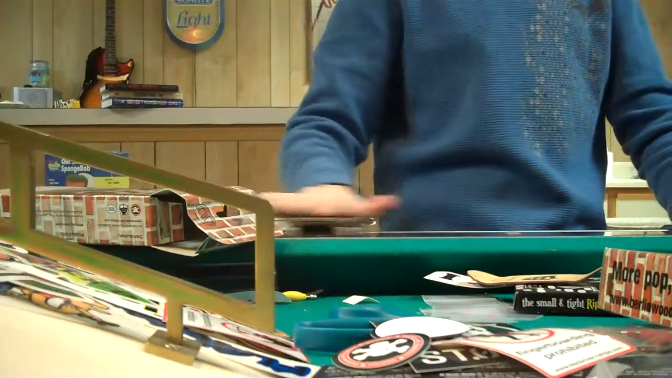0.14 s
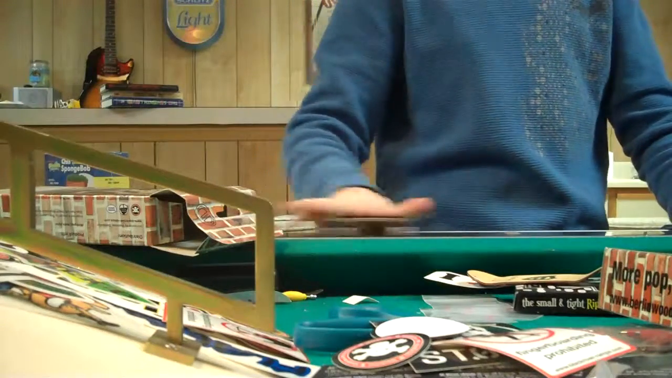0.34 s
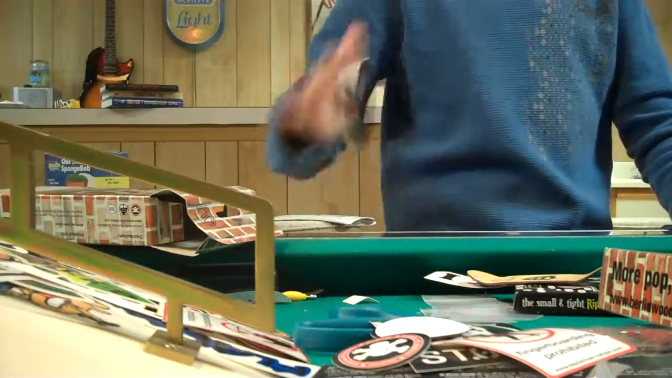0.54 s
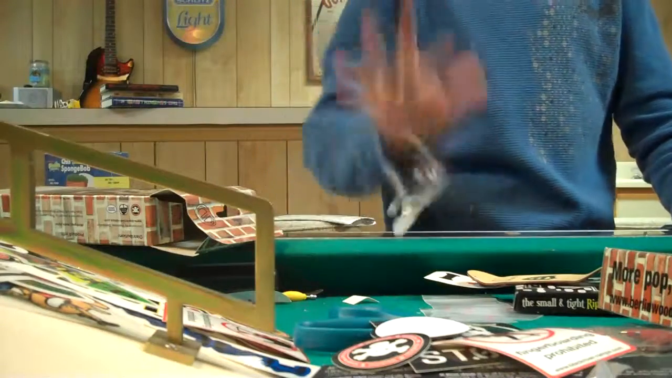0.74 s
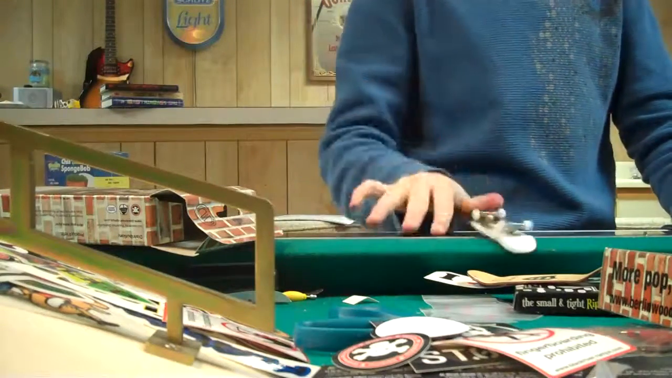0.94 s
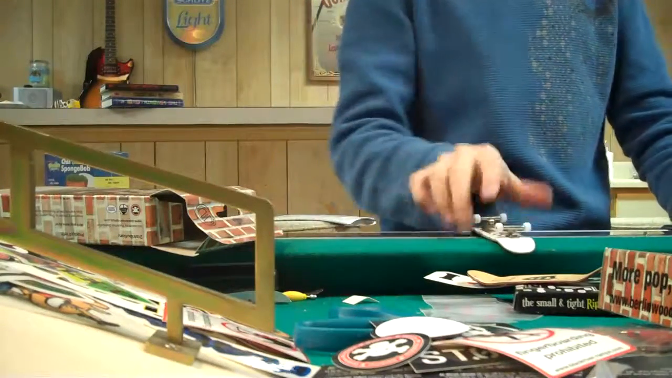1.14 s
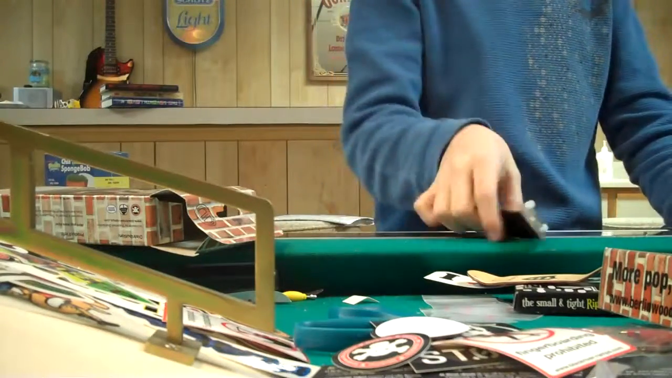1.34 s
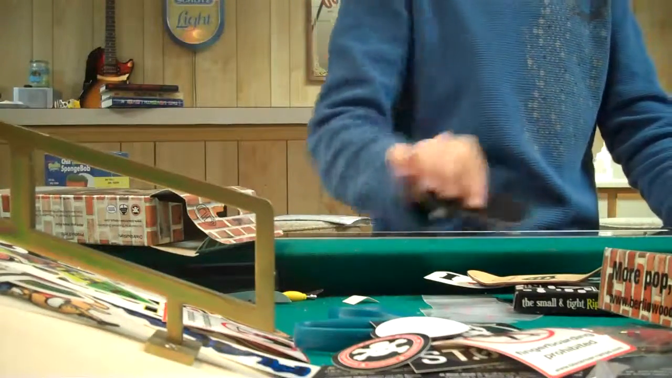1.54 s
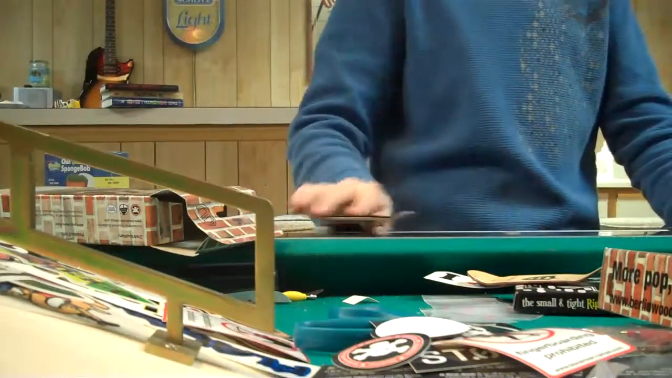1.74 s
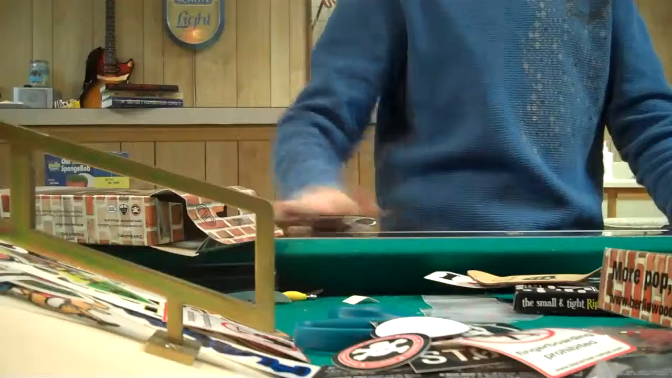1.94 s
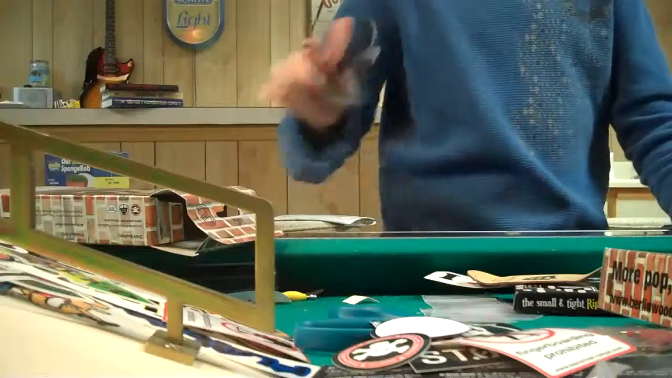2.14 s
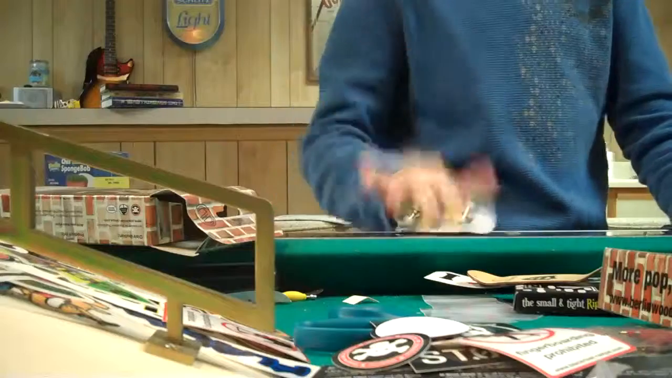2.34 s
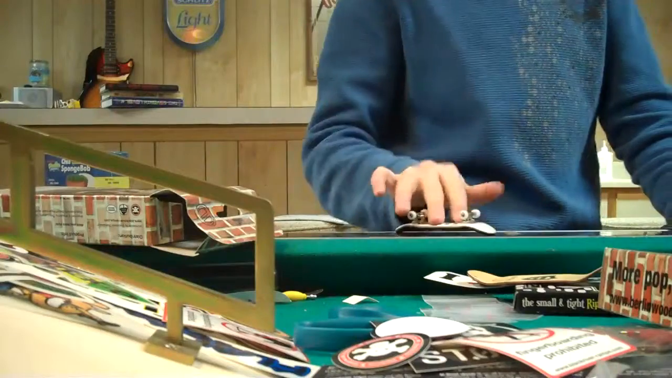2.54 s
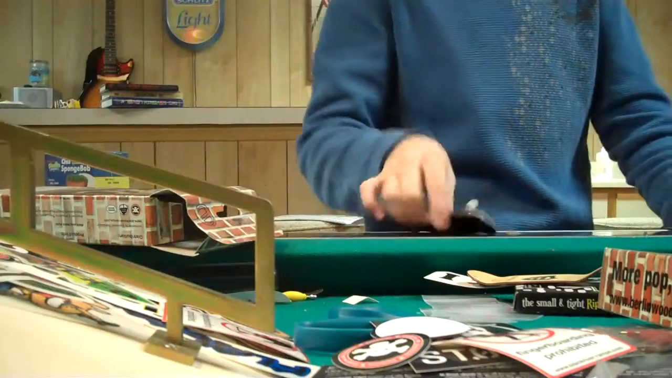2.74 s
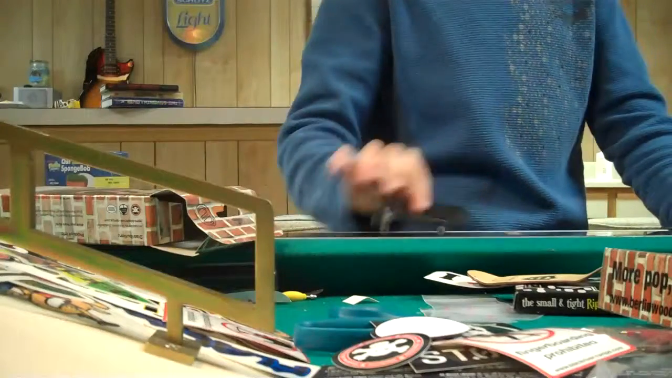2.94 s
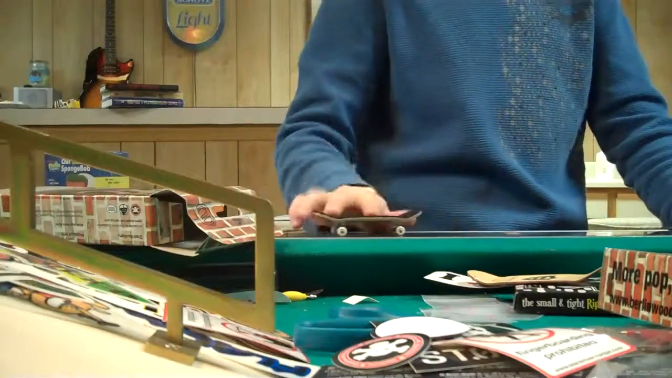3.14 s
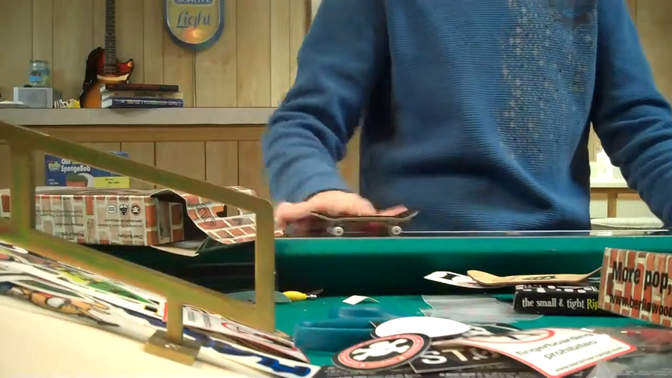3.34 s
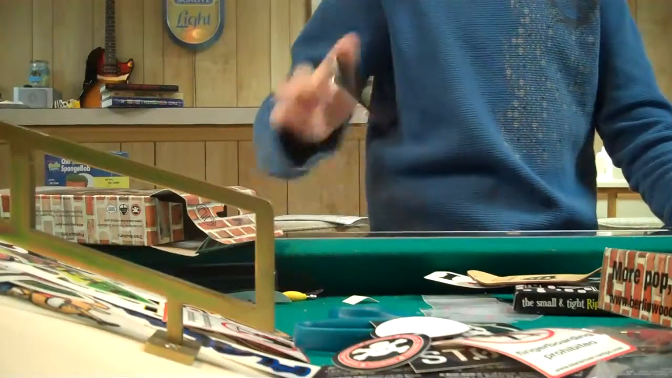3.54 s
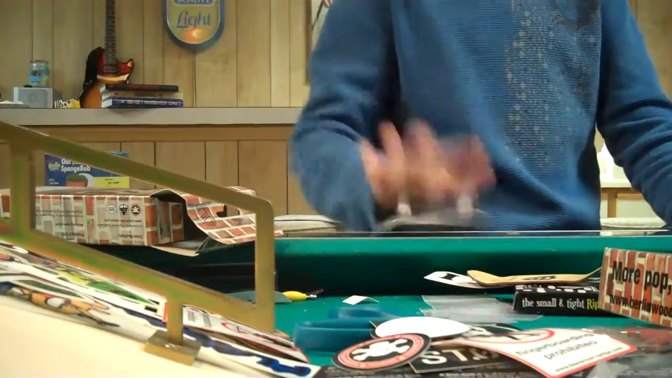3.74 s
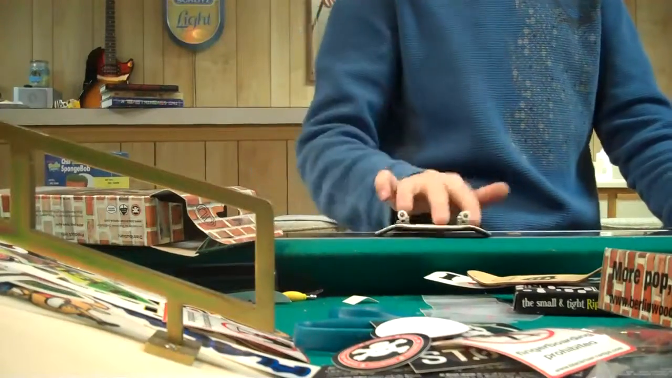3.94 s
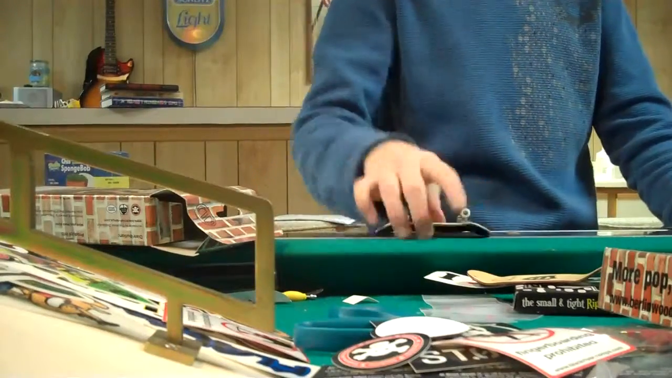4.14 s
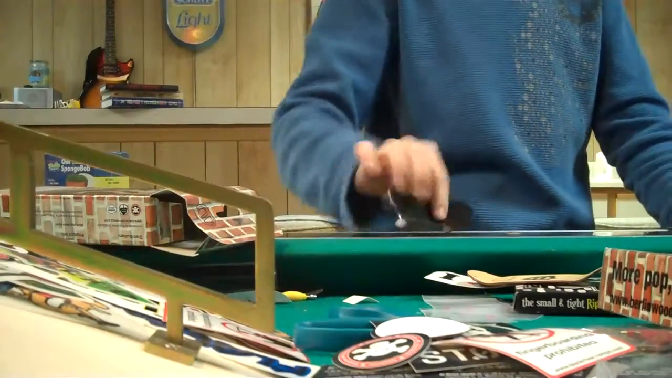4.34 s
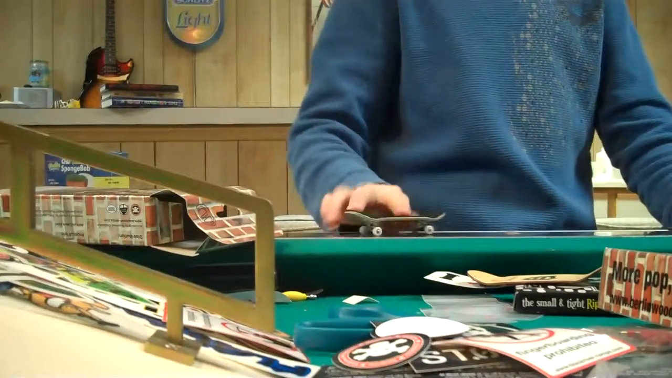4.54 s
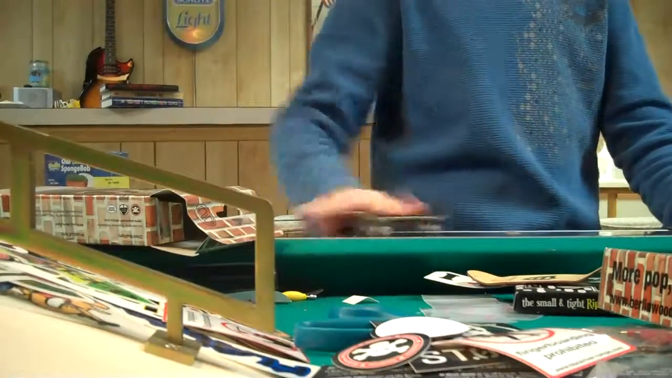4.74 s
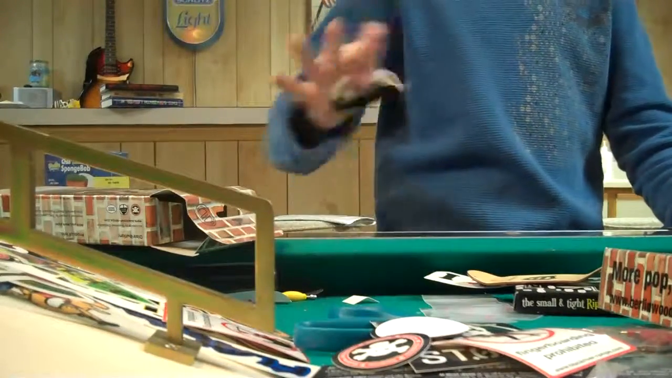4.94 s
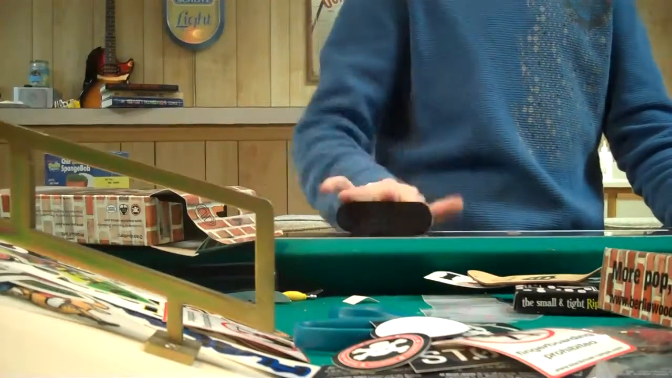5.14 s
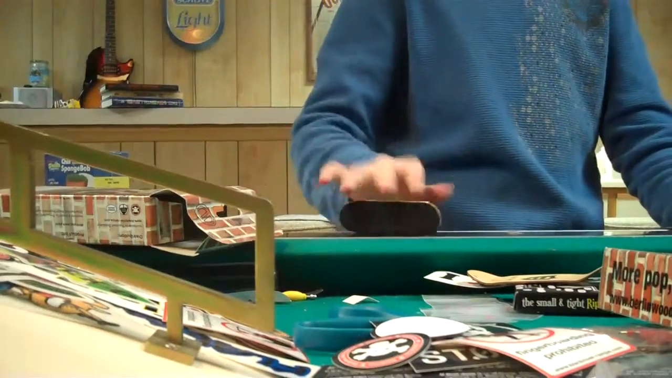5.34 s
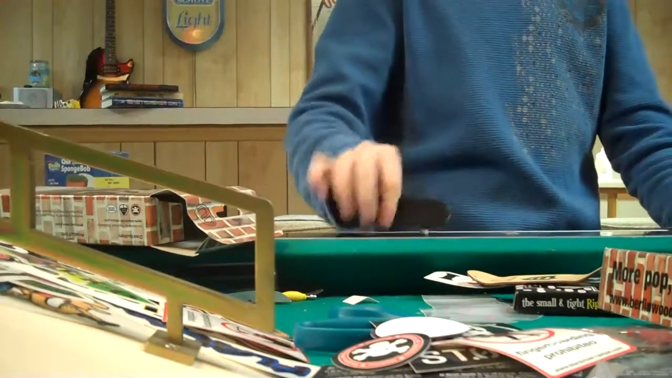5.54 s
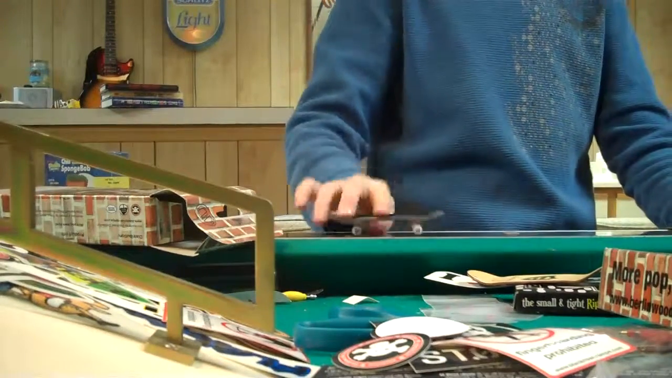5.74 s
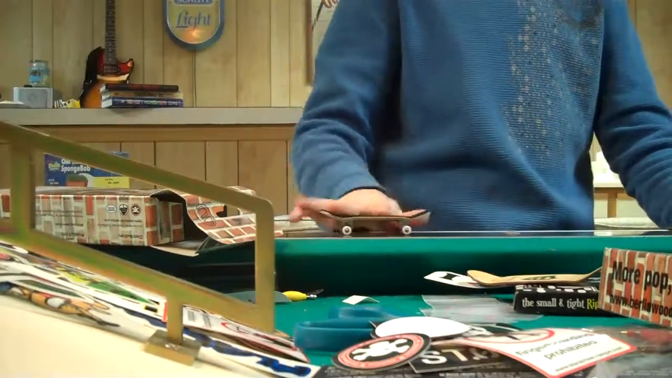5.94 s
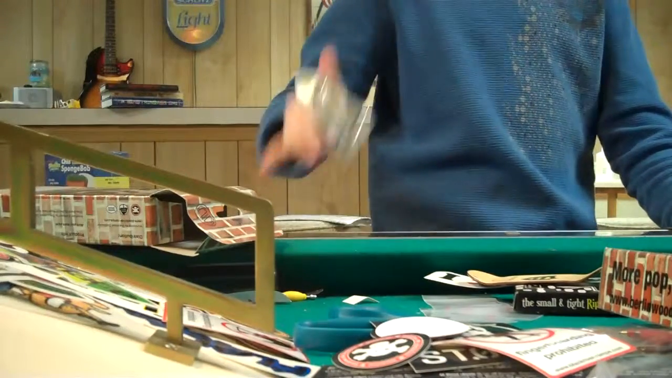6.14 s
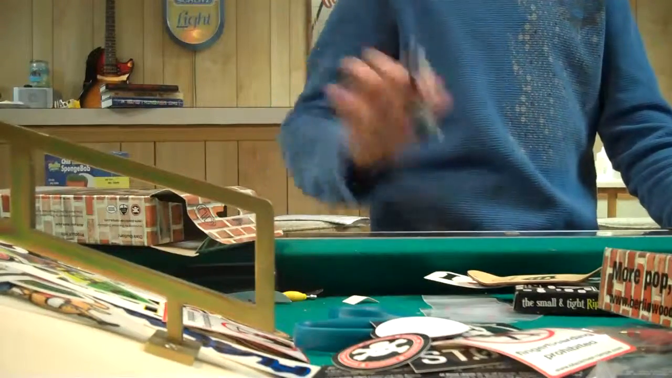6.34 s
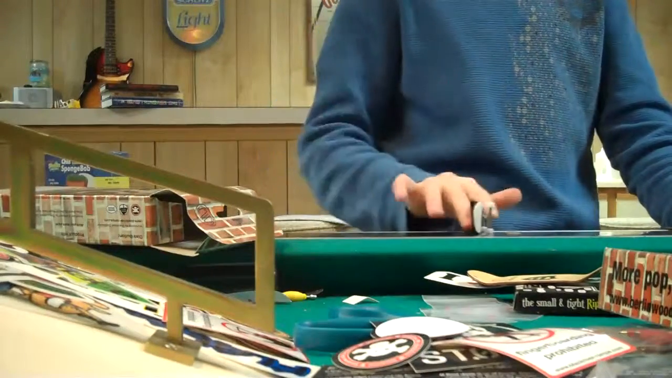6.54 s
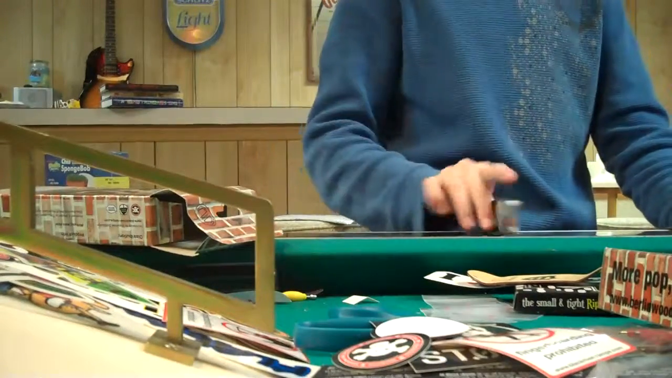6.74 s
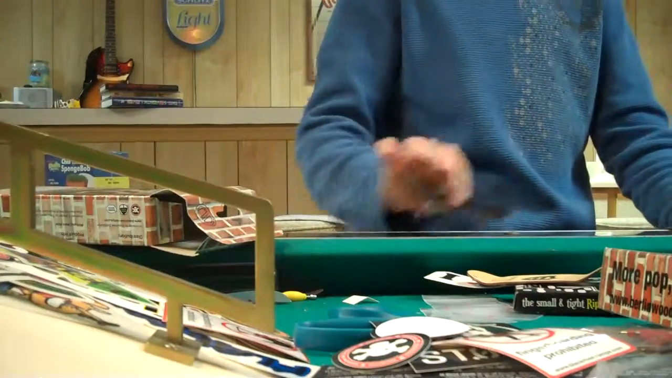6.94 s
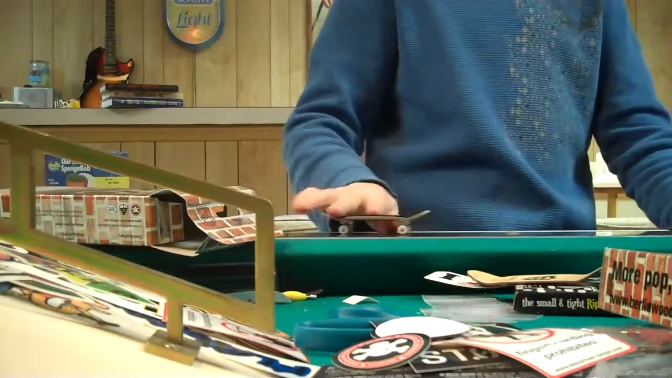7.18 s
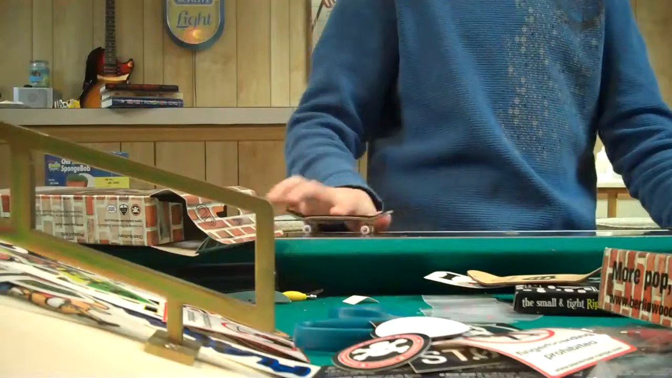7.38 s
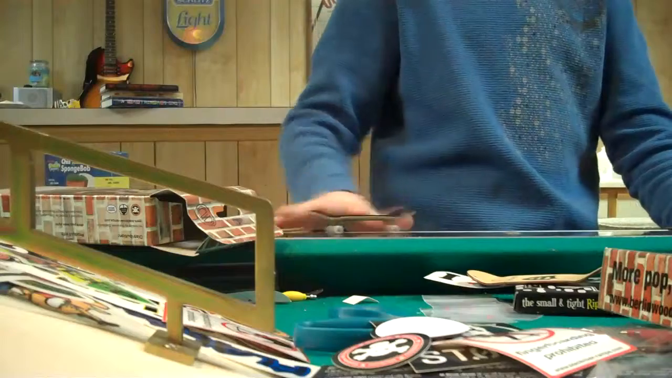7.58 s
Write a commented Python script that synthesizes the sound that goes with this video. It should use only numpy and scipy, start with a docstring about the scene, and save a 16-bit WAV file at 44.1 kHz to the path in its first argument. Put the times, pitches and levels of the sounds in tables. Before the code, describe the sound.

A small wooden fingerboard rolls briefly, snaps off its tail and clatters down on a hard tabletop, five times, in a small room.

```python
"""Fingerboard tricks on a tabletop

A wooden fingerboard rolls, pops off its tail, flips and clatters down in a small panelled room.
Contacts ring damped table and wheel modes and fire bursts of deck noise.
Rolling is shaped noise that follows the board's speed, with brief skids. Room echoes and faint hiss surround it.
Two close microphone ports hear it all; loud peaks clip softly, and brief low bursts stand for their overload.
"""
import sys
import numpy as np
from scipy import signal
from scipy.fft import rfft, irfft, next_fast_len
from scipy.io import wavfile
from scipy.ndimage import map_coordinates

SR = 44100
rng = np.random.default_rng(int(sys.argv[2]) if len(sys.argv) > 2 else 0)


def generate_wav(sig):
    """Save sig (samples, or channels by samples) to the path in sys.argv[1] as 16-bit PCM at SR."""
    pcm = np.round(np.clip(np.atleast_2d(sig).T, -1, 1) * 32767).astype(np.int16)
    wavfile.write(sys.argv[1], SR, pcm)


N = 335601

# tail snaps on the table after a short run-up: start_s, strength_db, run_up_s, run_up_db (levels relative)
TAIL_POPS = [(0.5552, -11, 0.052, -37.5), (2.0872, -12.5, 0.067, -33.5), (3.5196, -10.5, 0.077, -39.5),
             (4.9009, -10.5, .12, -33), (6.1642, -10, 0.066, -35.5)]


def amp(db):
    """Decibels to gain."""
    return 10 ** (np.asarray(db) / 20)


def unit(x):
    """Scale to rms 1."""
    return x / np.sqrt(np.mean(x ** 2) + 1e-20)


def struck(x, size=300):
    """Scale to rms 1 over the first 7 ms."""
    return x / np.sqrt(np.mean(x[..., :size] ** 2) + 1e-20)


def along(points, hz):
    """Interpolate (Hz, value) points on a log frequency axis."""
    f, v = np.transpose(points)
    return np.interp(np.log(hz + 1), np.log(f + 1), v)


def wobble(rate_hz):
    """Smooth random curve with rate_hz knots a second."""
    knots = rng.standard_normal(int(N * rate_hz / SR) + 4)
    return map_coordinates(knots, [np.arange(N) * rate_hz / SR])


def filtered(x, response):
    """Apply a response given as a function of frequency."""
    m = next_fast_len(N + 8192)
    return irfft(rfft(x, m) * response(np.fft.rfftfreq(m, 1 / SR)), m)[..., :N]


def coloured(x, spectrum):
    """Shape x by a (Hz, dB) spectrum, at rms 1."""
    return unit(filtered(x, lambda hz: amp(along(spectrum, hz))))


def causal(spectrum, peak_hz, width_hz, lift_db, size=1024):
    """Minimum-phase impulse response of a spectrum with one resonance on top."""
    hz = np.fft.rfftfreq(size, 1 / SR)
    db = along(spectrum, hz) + lift_db / (1 + (2 * (hz - peak_hz) / width_hz) ** 2)
    # fold the cepstrum onto positive time
    cepstrum = irfft(np.log(amp(db)))
    cepstrum[1:size // 2] *= 2
    cepstrum[size // 2 + 1:] = 0
    return irfft(np.exp(rfft(cepstrum)))


def add(track, s, sound):
    """Mix a sound in at time s."""
    part = track[:, max(round(s * SR), 0):][:, :sound.shape[-1]]
    part += sound[..., :part.shape[1]]


def clacks(rooms):
    """Each contact knocks the table, clonks the wheels and cracks the wooden deck."""
    # tabletop modes: mode_hz, level_db (relative), t60_s
    table_modes = [(150, -28, 0.14), (245.9, -24, 0.34), (386, -12.5, 0.04), (538.2, 0.5, 0.067),
                   (587, 1.5, 0.068), (705, -1, 0.04), (740, -3, 0.058)]
    # higher tabletop modes under a hard clack: mode_hz, level_db (relative), t60_s
    overtone_modes = [(1574, -8, 0.072), (2000, 0.5, 0.048), (2233, -4, 0.068), (2588, -1, 0.044),
                      (2610, -9.5, 0.034), (3338, -5, 0.11), (3790, -1.5, 0.066)]
    # thud of table, frame and what lies on it: freq_hz, level_db (relative)
    thud_spectrum = [(40, -27.5), (130, -16.5), (250, -8.5), (400, -13), (520, -5), (700, 9.5), (900, -13),
                     (1300, -0.5), (2000, -28), (5000, -63)]
    # deck clack: freq_hz, level_db (relative)
    clack_spectrum = [(40, -48), (200, -51), (900, -7), (1500, 7), (2000, 1.5), (2800, 4), (3500, 2),
                      (5000, -20), (12000, -43.5)]
    # sharp click: freq_hz, level_db (relative)
    click_spectrum = [(40, -59.5), (300, -36), (2700, -17.5), (3600, 1), (4500, 2.5), (5500, 2),
                      (7000, 2.5), (8000, -4), (9000, -9), (11000, -15.5), (14000, -23), (15000, -54)]
    # share of the table's ringing that follows the wheels' blow; a tail pressed down only thuds
    free_ring = 0.3
    # left-right balance, and its variation with the board's angle
    balance_db, balance_scatter_db = 0.15, 2.5

    out, t = np.zeros((2, N)), np.arange(SR // 10) / SR
    dull = causal(thud_spectrum, peak_hz=540, width_hz=88, lift_db=8)
    wood = causal(clack_spectrum, peak_hz=1800, width_hz=120, lift_db=3.5)
    for k, contact in enumerate(contacts()):
        s, knock_db, clonk_db, clack_db, click_db, wheel_hz, click_hz = contact
        pan_db = balance_db + balance_scatter_db * rng.standard_normal()
        table_db = knock_db + free_ring * (clonk_db - knock_db) - 7.5
        modes = amp(table_db) * ring(table_modes, t, detune=0.017, attack_s=0.00039)
        modes += amp(clonk_db - 5.0) * ring(trucks(wheel_hz), t, detune=0.016, attack_s=0.0012)
        modes += amp(clack_db - 7.5) * ring(overtone_modes, t, detune=0.005, attack_s=0.0004)
        # the contact is far shorter than a cycle of the table's thud
        modes += amp(knock_db - 4.5) * struck(np.pad(dull, (0, len(t) - len(dull))))
        clack, clack_spread = crack(wood, t, t60_s=0.0042, rattle_db=-11.5, rattle_t60_s=0.073,
                                    side_db=-7.5, spread_db=0.5)
        # the spot that is struck decides which deck resonance leads
        edge = causal(click_spectrum, click_hz, width_hz=750, lift_db=9.5)
        click, click_spread = crack(edge, t, t60_s=0.0071, rattle_db=-12.0, rattle_t60_s=0.068,
                                    side_db=1, spread_db=-3.26)
        direct = modes + amp(clack_db) * clack + amp(click_db) * click
        spread = amp(-2.0) * modes + amp(clack_db) * clack_spread + amp(click_db) * click_spread
        add(out, s, direct * amp([[pan_db / 2], [-pan_db / 2]]))
        add(out, s, signal.fftconvolve(spread[None], rooms[k % len(rooms)], axes=1))
    # so small a board radiates little bass
    return signal.sosfilt(signal.butter(2, 110, "highpass", fs=SR, output="sos"), out)


def contacts():
    """Contacts in time order: start_s, knock_db, clonk_db, clack_db, click_db, wheel_hz, click_hz."""
    # landings and bounces: start_s, strength_db, lean_db (+ onto wheels, - onto deck edge),
    # weight_db (put into the table), wheel_hz, click_hz
    landing_rows = [(0.8652, -23, -1.5, 6, 1050, 5940), (0.898, -14, 0, -5.5, 980, 4130),
                    (0.9419, -20.5, -8, 0.5, 1300, 7160), (1.6772, -31, -10, -5.5, 1000, 8060),
                    (1.6976, -21.5, -9, -5.5, 1100, 5640), (1.719, -17.5, -0.5, -10.5, 1010, 6550),
                    (2.408, -10, -3.5, -4, 870, 3700), (2.4519, -6.5, 0.5, -9.5, 970, 7600),
                    (3.0491, -21, -5.5, -10.5, 990, 5210), (3.0745, -24, -13, -8.5, 1250, 7350),
                    (3.0815, -12, -4, -7.5, 970, 6240), (3.8423, -19, -2.5, 4.5, 1100, 3960),
                    (3.851, -19, -4, -1, 1040, 4360), (3.8902, -23, -5, 1, 1090, 4210),
                    (4.3486, -19.5, -3, -12.5, 1000, 5850), (4.3805, -29.5, -1, -1, 810, 5560),
                    (4.4579, -19.5, -2, -10, 980, 5240), (4.4863, -16.5, -3, -6.5, 1100, 6330),
                    (4.5268, -14, -1.5, -12.5, 1100, 6220), (5.1857, -14, -6.5, -16, 1000, 7240),
                    (5.1945, -21, -4.5, -22.5, 1300, 3200), (5.208, -11, 5.5, -2, 1280, 6270),
                    (5.2145, -13, -0.5, -19, 1220, 3020), (5.232, -26, 12, -4, 1300, 5930),
                    (5.6172, -30.5, -1, -15, 1300, 5150), (5.7444, -30.5, -10.5, -8.5, 1010, 7460),
                    (5.7888, -19.5, -6, -12.5, 1300, 7400), (5.9805, -14.5, -5.5, -14, 1290, 7350),
                    (6.5222, -2.5, 2.5, -9.5, 1000, 5500), (6.53, -11, -2.5, -15, 1000, 3390),
                    (7.0679, -22.5, -5, -16, 1000, 6550), (7.0879, -18.5, -8.5, -16, 1300, 7450),
                    (7.102, -13, 0.5, -14, 990, 6300)]
    # wheels set down or meeting a bump: start_s, strength_db, hard_db (click over clonk)
    tap_rows = [(0.3001, -25, -3.5), (0.3574, -30.5, -5), (1.9242, -36, -9.5), (2.7897, -39.5, -12),
                (2.9531, -26, 1), (3.401, -24.5, -12), (4.7306, -31.5, -13.5), (4.8126, -27, -11),
                (4.833, -32.5, 0.5), (4.864, -49.5, 8.5), (5.4728, -30.5, -7), (5.487, -24.5, -9),
                (5.507, -34.5, -21), (5.868, -32.5, -16), (6.644, -25.5, -10.5), (6.7641, -25.5, -11),
                (6.815, -23.5, -5), (6.888, -31.5, -4.5), (7.4203, -32.5, -22), (7.5183, -25.5, -12.5)]
    # click pitch of a tap: hard_db (click over clonk), click_hz
    tap_pitch = [(-3, 4100), (-11.5, 6800)]
    # fingers nudge or turn the board: start_s, strength_db, weight_db (put into the table), click_hz
    nudge_rows = [(1.0337, -32.5, -1, 8050), (1.0923, -46.5, -8, 6900), (1.2906, -55, 10, 5700),
                  (1.3206, -48, -14, 3720), (1.358, -47.5, -19, 5600), (1.48, -48.5, -8, 6300),
                  (4.2339, -45, -12, 3820), (5.1043, -43, -28, 7770), (6.4214, -53, -16, 5900)]
    # deck clack re strength; dB it loses per dB of weight pressing on the deck
    deck_db, deck_damping = -8.5, 0.35
    # leading wheel resonance when lifted, and when pressed down by the fingers
    lifted_hz, pressed_hz = 1270, 1040

    rows = []
    for s, db, lean, weight, wheel_hz, click_hz in landing_rows:
        clack_db = db + deck_db - deck_damping * weight
        rows.append((s, db + weight, db + lean, clack_db, db - lean, wheel_hz, click_hz))
    for s, db, _, _ in TAIL_POPS:
        rows.append((s, db - 10, db - 13, db - 18, db + 1, lifted_hz, 7280))
    for s, db, hard in tap_rows:
        click_hz = np.interp(hard, *np.transpose(tap_pitch))
        rows.append((s, db - 13, db, db - 13, db + hard, pressed_hz, click_hz))
    for s, db, weight, click_hz in nudge_rows:
        rows.append((s, db + weight, db - 24, db - 22, db, pressed_hz, click_hz))
    return sorted(rows)


def trucks(lead_hz):
    """Wheel-on-truck modes; the load on the trucks decides which of them leads."""
    # mode_hz, level_db (relative, before the lead), t60_s
    truck_modes = [(830, -6, 0.045), (863, -11.5, 0.099), (990.4, -5, 0.071), (1079, 0.5, 0.029),
                   (1304, -1, 0.019)]
    lead_db, lead_width_hz = 11, 240
    return [(hz, db + lead_db / (1 + (2 * (hz - lead_hz) / lead_width_hz) ** 2), t60)
            for hz, db, t60 in truck_modes]


def ring(modes, t, detune, attack_s):
    """Damped sine modes; strength and pitch vary with the spot and the finger pressure."""
    scatter_db = 2.5
    hz, db, t60 = np.transpose(modes)[:, :, None]
    pitch, level = rng.standard_normal((2, len(modes), 1))
    sign = rng.choice([-1, 1], (len(modes), 1))
    decay = amp(db + scatter_db * level - 60 * t / t60)
    waves = sign * decay * np.sin(2 * np.pi * hz * (1 + detune * pitch) * t)
    return struck(waves.sum(0) * (1 - np.exp(-t / attack_s)))


def crack(colour, t, t60_s, rattle_db, rattle_t60_s, side_db, spread_db):
    """Brief noise burst plus rattle of loose trucks: as heard at the ports, and as spread over the room."""
    attack_s = 0.00025
    envelope = amp(-60 * t / t60_s) + amp(rattle_db - 60 * t / rattle_t60_s)
    envelope *= 1 - np.exp(-t / attack_s)
    noise = rng.standard_normal((2, len(t))) * envelope
    mid, side = signal.fftconvolve(noise, colour[None], axes=1)[:, :len(t)]
    # summed over all directions, the dips of the deck's radiation fill in
    spread = amp(spread_db) * struck(np.pad(colour, (0, len(t) - len(colour))))
    return struck(mid + amp(side_db) * np.array([side, -side])), spread


def rolling(answer):
    """The wheels hum over small bumps of the tabletop, rasp on its grit and now and then skid."""
    # wheel hum: freq_hz, level_db (relative)
    hum_spectrum = [(100, -39), (300, -42), (520, -17.5), (720, -1.5), (920, -13.5), (1080, 9), (1230, 1.5),
                    (1350, -0.5), (1550, -13.5), (2100, -17.5), (3000, -32), (8000, -65)]
    # gritty rasp: freq_hz, level_db (relative)
    rasp_spectrum = [(40, -33.5), (150, -22.5), (400, -9.5), (600, 9), (1500, 3.5), (2100, 8), (2800, 4.5),
                     (3500, 7), (4500, 3), (6300, 5), (7500, 1.5), (8700, -13), (11000, -17.5),
                     (14000, -28.5)]
    # how far bumps shake the hum, and grit the rasp
    bump_db, grit_db = 3.5, 2

    hum_gain, rasp_gain = pushes()
    bumps = wobble(75)
    # changing finger pressure bends the pitch of the hum
    bent = np.arange(N) + np.cumsum(0.039 * wobble(18))
    tone = map_coordinates(coloured(rng.standard_normal(N), hum_spectrum), [bent], mode="reflect")
    hum = amp(-2.5) * hum_gain * unit(amp(bump_db * bumps)) * tone
    grit = rng.standard_normal((2, N)) * amp(grit_db * (wobble(700) + bumps / 2))
    mid, side = amp(-2.5) * rasp_gain * coloured(grit, rasp_spectrum)
    direct = hum + skids() + mid + amp(-3) * np.array([side, -side])
    return direct + signal.fftconvolve(direct, answer, axes=1)[:, :N]


def pushes(overrun=1.25):
    """Gains of hum and rasp; a run-up is cut short by its pop, which lifts the wheels."""
    # pushes of the board: fastest_s, length_s, hum_db, rasp_db (levels relative)
    roll_rows = [(0.01, 0.17, -29, -26.5), (0.213, 0.21, -29.5, -30), (0.437, 0.15, -25.5, -27.5),
                 (1.775, 0.2, -33, -33.5), (2.01, 0.16, -53, -48.5), (3.163, 0.23, -38, -55),
                 (4.638, 0.25, -40.5, -56), (5.938, 0.16, -45, -61), (6.847, 0.21, -52, -51.5),
                 (7.19, 0.15, -37.5, -45), (7.349, .16, -37.5, -48), (7.595, 0.092, -40.5, -51)]
    run_up_rasp_db = -2.5  # rasp over hum while the fingers load the tail
    t, hum, rasp = np.arange(N) / SR, np.zeros(N), np.zeros(N)
    for s, length, hum_db, rasp_db in roll_rows:
        gain = push(t, s, length)
        hum += amp(hum_db) * gain
        rasp += amp(rasp_db) * gain
    for s, _, run_up, db in TAIL_POPS:
        length = overrun * run_up
        gain = amp(db) * push(t, s - run_up + length / 2, length) * (t < s)
        hum += gain
        rasp += amp(run_up_rasp_db) * gain
    return hum, rasp


def push(t, middle_s, length_s):
    """Rolling gain, a power of the speed, as the hand speeds the board up and slows it down."""
    speed = np.clip(1 - (2 * (t - middle_s) / length_s) ** 2, 0, 1)
    return speed ** 1.3


def skids():
    """Each skid of wheels or fingertips is a short swell of friction noise in one resonance."""
    # middle_s, half_s (Gaussian sigma), pitch_hz, width_hz, level_db
    skid_rows = [(1.386, 0.022, 6000, 2900, -60), (2.026, 0.022, 2900, 810, -45),
                 (2.933, 0.0054, 5700, 4120, -48.5), (3.223, 0.0048, 1250, 131, -35),
                 (4.256, 0.021, 5970, 4100, -59), (4.626, 0.0078, 1210, 150, -39),
                 (4.681, 0.0024, 1220, 169, -35.5), (4.867, 0.0091, 4860, 907, -29.5),
                 (7.393, 0.0084, 1070, 119, -47), (7.448, 0.0072, 1033, 80, -33)]
    out, t = np.zeros((1, N)), np.arange(SR // 5) / SR
    hz, middle = np.fft.rfftfreq(len(t), 1 / SR), t.mean()
    for s, half, pitch_hz, width_hz, db in skid_rows:
        resonance = np.minimum(hz / pitch_hz, 1) / (1 + ((hz - pitch_hz) / width_hz * 2) ** 2)
        noise = irfft(rfft(rng.standard_normal(len(t))) * resonance)
        swell = np.exp(-((t - middle) / half) ** 2 / 2)
        add(out, s - middle, amp(db) * unit(noise * swell) * np.sqrt(np.mean(swell ** 2)))
    return out[0]


def overload_bursts(t60_s=0.034, top_hz=260):
    """Low decaying noise bursts, as the loudest peaks overload the microphones; independent at each port."""
    # start_s, level_db (mean of both ports)
    overload_rows = [(2.4105, -29.5), (2.449, -32.5), (5.209, -39), (6.519, -35), (6.532, -36)]
    out, t = np.zeros((2, N)), np.arange(SR // 10) / SR
    soft = signal.butter(2, top_hz, fs=SR, output="sos")
    for s, db in overload_rows:
        burst = signal.sosfilt(soft, rng.standard_normal((2, len(t))) * amp(-60 * t / t60_s))
        add(out, s, amp(db) * amp([[2], [-2]]) * struck(burst))
    return out


def room(count, build_s=0.013):
    """Stereo room answers for several spots on the table: early echoes and a diffuse noise tail."""
    # decay of the tail: freq_hz, t60_s
    decay_points = [(100, 0.24), (300, 0.41), (560, 0.24), (2000, 0.4), (5000, 0.3), (7800, 0.27),
                    (12000, 0.24)]
    # colour of the tail: freq_hz, level_db (relative)
    tone_points = [(100, -4.5), (300, 12.5), (600, 4), (1000, -6), (2000, -3), (4500, 0), (7500, -2),
                   (12000, -3)]
    # early echoes: delay_s (before scatter), level_db
    wall_rows = [(.0023, -11), (.0065, -18.5), (.0077, -9), (0.0119, -25.5), (0.0245, -15)]
    hz, t, z = signal.stft(rng.standard_normal((count, 2, 2 * SR // 5)), SR, nperseg=256)
    fade = amp(along(tone_points, hz)[:, None] - 60 * t / along(decay_points, hz)[:, None])
    tails = signal.istft(z * fade, SR, nperseg=256)[1]
    tails *= 1 - np.exp(-np.arange(tails.shape[-1]) / SR / build_s)
    tails *= amp(-5.5) / np.sqrt(np.sum(tails ** 2, -1, keepdims=True))
    for delay, db in wall_rows:
        # 6 samples of scatter between spots and ports
        arrival = np.abs(delay * SR + 6 * rng.standard_normal((count, 2, 1))).astype(int)
        tails += amp(db) * (np.arange(tails.shape[-1]) == arrival)
    return tails


def room_tone():
    """Faint steady air and microphone hiss: shaped stereo noise."""
    # freq_hz, level_db (relative)
    air_spectrum = [(15, -37), (25, -14), (150, 2.5), (224, 0.5), (1120, -2), (1210, -7.5), (1460, -4),
                    (4380, -8), (5420, -6), (6540, -7), (12100, -15), (13800, -9), (15000, -36.5)]
    mid, side = coloured(rng.standard_normal((2, N)), air_spectrum)
    return amp(-62.5) * (mid + amp(-1.5) * np.array([side, -side]))


def scene():
    """Board and room at two close microphone ports, which hear the low mids most alike."""
    rooms = room(count=12)
    left, right = clacks(rooms) + rolling(rooms[0])
    # freq_hz, side_db
    width = [(80, -2.0), (250, -18), (600, -18), (1200, -3.5), (2500, -5), (6000, 0.5)]
    side = filtered((left - right) / 2, lambda hz: amp(along(width, hz)))
    return (left + right) / 2 + np.array([side, -side]) + overload_bursts() + room_tone()


def record(dry, lag_samples=0.99, ceiling=0.94, hardness=7, top_hz=15600):
    """Ports differ in colour and the left lags by part of a sample; loud peaks clip; the top is cut off."""
    # port balance: freq_hz, left_over_right_db
    port_balance = [(100, 0.5), (500, 0), (800, -2.5), (2000, 0), (3600, .5), (5800, -5), (6800, 4),
                    (7800, 10), (9500, 7.5), (13000, 5)]

    def port(hz, way):
        """Half of the balance and half of the lag, one way or the other."""
        delay = np.exp(-1j * way * np.pi * hz * lag_samples / SR)
        return amp(way * along(port_balance, hz) / 2) * delay

    x = filtered(dry, lambda hz: np.array([port(hz, 1), port(hz, -1)]))
    clipped = x / (1 + np.abs(x / ceiling) ** hardness) ** (1 / hardness)
    return filtered(clipped, lambda hz: np.clip((top_hz - hz) / 600 + 0.5, 0, 1))


dry = scene()
out = record(dry)
generate_wav(out)
```